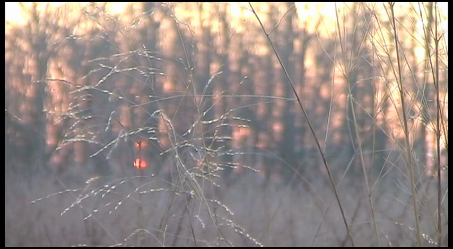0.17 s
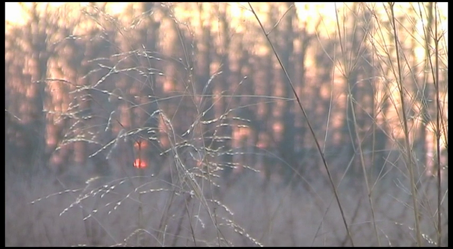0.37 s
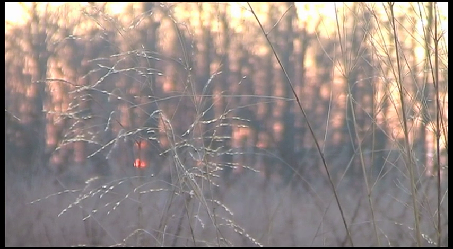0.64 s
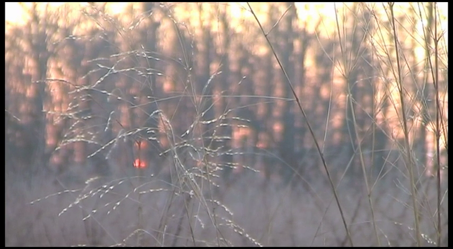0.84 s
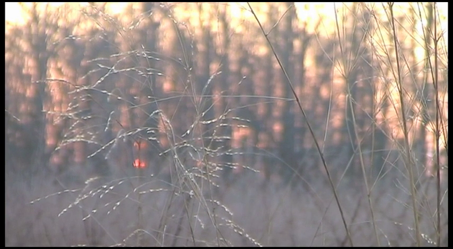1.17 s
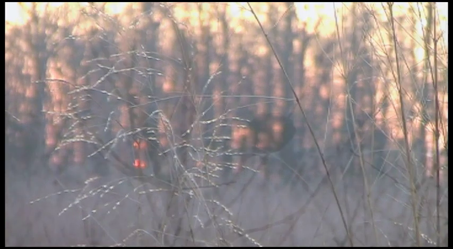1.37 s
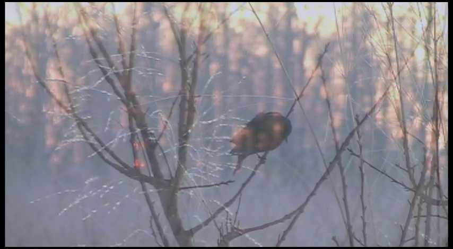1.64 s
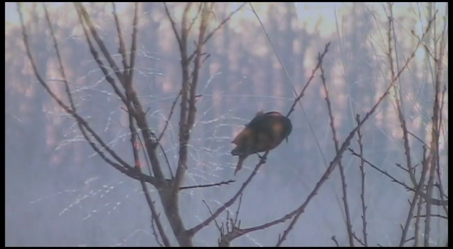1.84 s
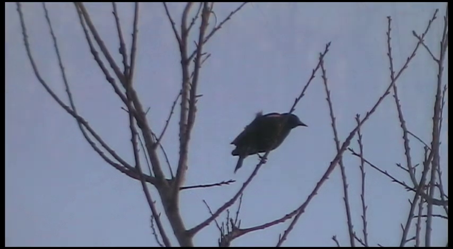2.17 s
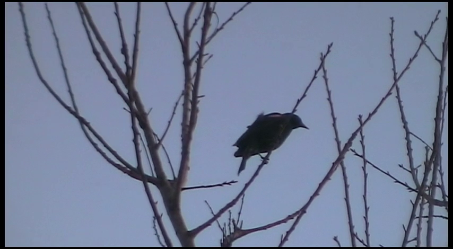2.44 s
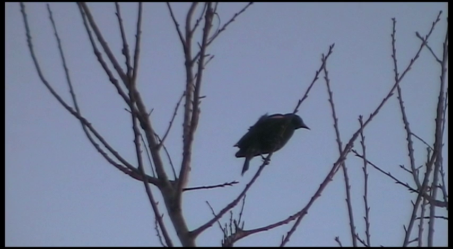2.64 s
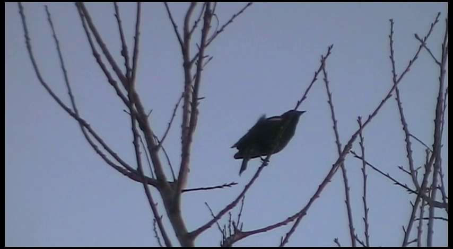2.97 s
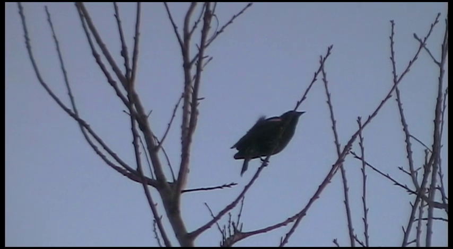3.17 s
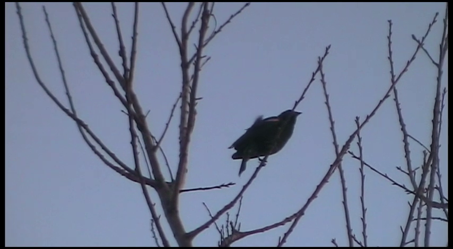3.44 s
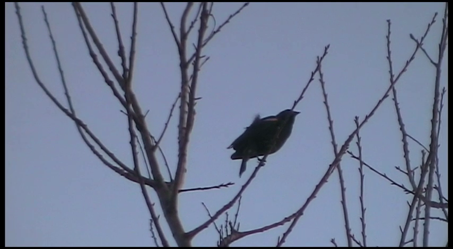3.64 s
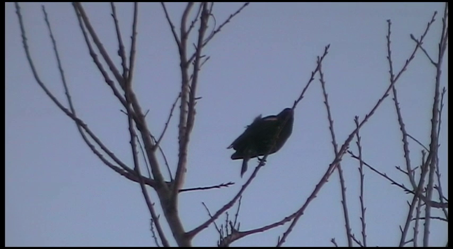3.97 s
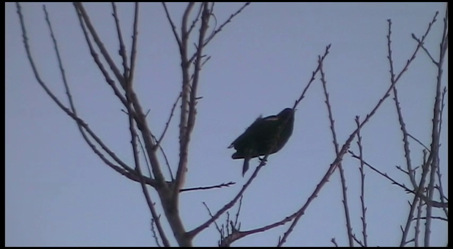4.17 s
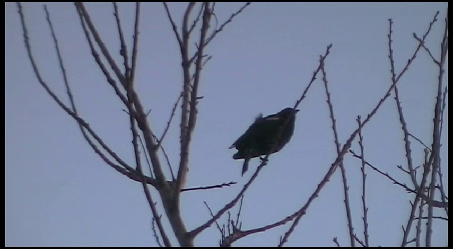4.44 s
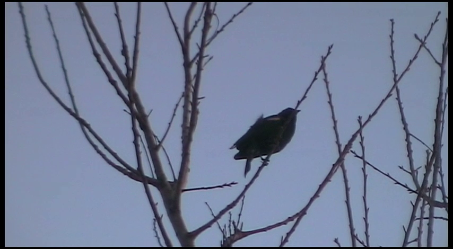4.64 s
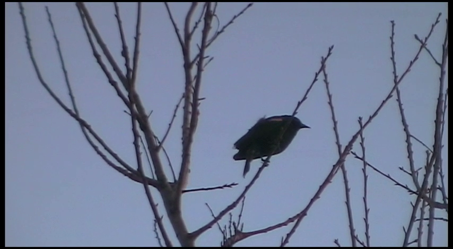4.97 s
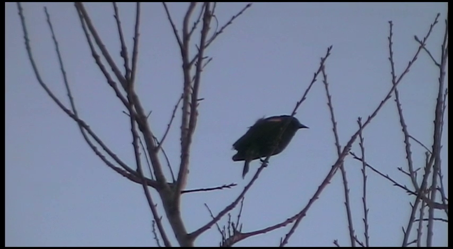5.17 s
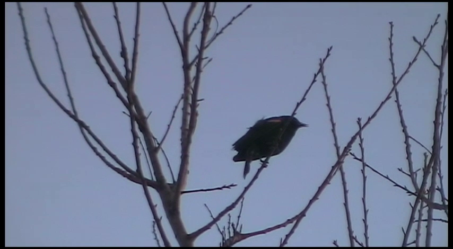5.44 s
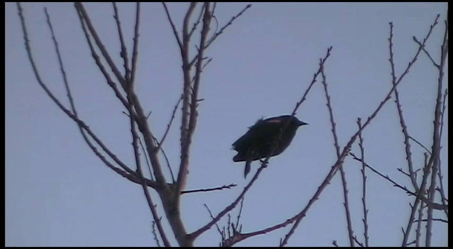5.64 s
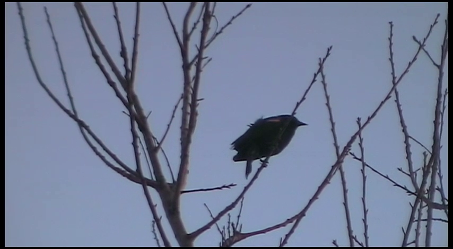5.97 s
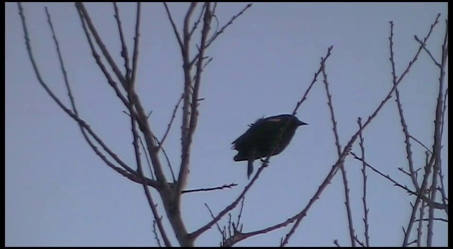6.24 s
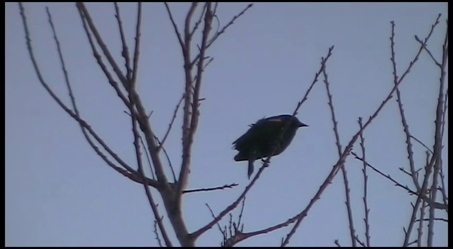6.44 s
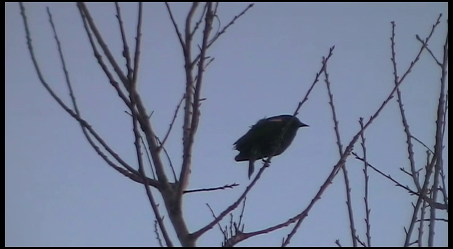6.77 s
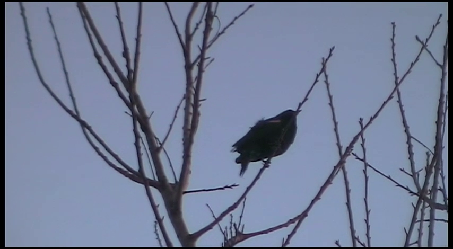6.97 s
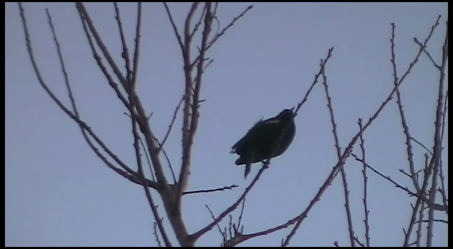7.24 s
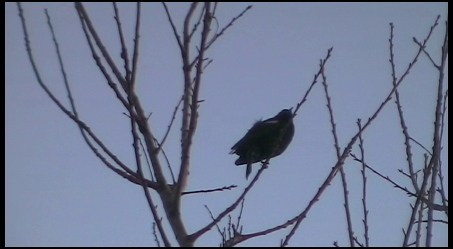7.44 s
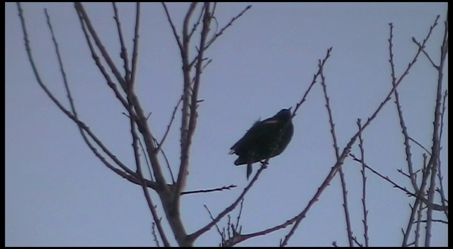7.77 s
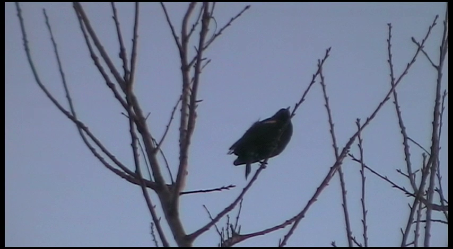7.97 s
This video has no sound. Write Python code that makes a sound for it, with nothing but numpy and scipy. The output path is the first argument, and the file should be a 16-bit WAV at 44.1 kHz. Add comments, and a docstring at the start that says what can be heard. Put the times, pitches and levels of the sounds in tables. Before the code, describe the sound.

Piercing rising and falling bird whistles ring over a distant, blurry chorus of chattering marsh birds, with low rumble, faint hum and tape hiss.

```python
"""Marsh at dawn: a near blackbird whistles long glides over a far chorus that murmurs and breaks into chatter.
Gliding sines make the whistles, chips and single notes; stacked partials make nasal calls; echoes trail them.
The chorus layers dozens of singers in three registers. A mono microphone feeds these and a low rumble
only to the left input of a tape camcorder; both inputs carry its hiss, hum and whine.
Rumble, hiss and hum step up a little after the first second."""
import sys
import numpy as np
from scipy import signal
from scipy.fft import rfft, irfft
from scipy.io import wavfile
from scipy.ndimage import uniform_filter1d

SR = 44100
rng = np.random.default_rng(int(sys.argv[2]) if len(sys.argv) > 2 else 0)


def inscribe(sig):
    """Save sig as 16-bit PCM at rate SR to the path in sys.argv[1].

    A 1-D sig is mono; a 2-D sig holds one channel per row.
    Samples are clipped to [-1, 1] before scaling.
    """
    pcm = np.round(np.clip(np.atleast_2d(sig).T, -1, 1) * 32767)
    wavfile.write(sys.argv[1], SR, pcm.astype(np.int16))


N = 358091

# how strongly the chorus sings at each pitch: [f/Hz, gain/dB]
FLOCK_RANGE = [(900, -83), (1250, -65), (1450, -68), (1900, -62), (2500, -53.5), (3400, -48), (4000, -50.5),
               (4900, -51), (5600, -56), (6300, -51), (7300, -59), (9000, -61), (10500, -71), (12000, -100)]
# borders between low, middle and high singers: [f/Hz, f/Hz]
REGISTER_BORDERS = (3630, 5360)
# bouts of chatter in the far flock: [t/s, length/s, low level/dB, middle level/dB, high level/dB]
BOUTS = [(0.0, 0.014, 12, 16.5, -7), (.05, 0.083, 2, -2, -6), (0.263, 0.13, -6, -6, -4),
         (0.604, 0.09, -6, -2, 3), (0.718, 0.14, -11, 3.5, 5.5), (0.926, .11, 2.5, 1.5, -4),
         (1.148, 0.12, -8, 5, 2), (1.299, 0.28, -0.5, 2, -4.5), (1.608, 0.13, 0.5, 3, 8.5),
         (1.786, 0.36, -2.5, -2, 0), (2.29, 0.24, 1, -14, -5), (2.677, 0.2, 4.5, 5, 2.5),
         (2.9, 0.31, 0.5, 0.5, -5), (3.306, .15, 0, 2, 7), (3.516, .2, 4.5, -6, -1),
         (3.711, 0.12, 5, 6, 6.5), (3.846, 0.3, 3.5, 4.5, 6), (4.215, 0.37, 4, 5.5, 5.5),
         (4.646, 0.2, 6, -2, -3), (4.852, 0.21, 0.5, 4, 0), (5.043, 0.18, -3.5, 0, 0.5),
         (5.24, 0.23, -1, -2, -1.5), (5.604, .12, 7, 3, 2.5), (5.798, 0.16, 5, -4, 1),
         (5.918, 0.25, 6.5, 0.5, 2), (6.096, 0.38, 4, 5, 6), (6.494, 0.25, 4, 0, 0),
         (6.719, 0.096, 3.5, 7, 8), (6.95, .07, -15, -.3, 5), (7.08, 0.15, 3.5, -3, 1),
         (7.25, 0.18, -.3, 4.5, -2), (7.5, 0.14, 1.5, -3, -6), (7.614, 0.46, 4.5, -3, 5)]
MURMUR_DB, BOUT_ATTACK_S, BOUT_RELEASE_S = -4, 0.046, 0.12
DRIFT_DB, DRIFT_PER_S = 1.5, 9  # random swelling of each register
FAR_T60_S, FAR_WET = .3, .7  # decay time and echo share of the far flock
REED_T60_S, REED_DB = .38, -10  # decay time and level of the echo behind the separate birds

# rumble of air and distance in the microphone: [f/Hz, level/dB per Hz]
RUMBLE = [(8, -80.5), (20, -77.5), (30, -83.5), (42, -80), (75, -79.5), (105, -82.5), (200, -89),
          (400, -94), (700, -98), (1000, -103), (1500, -104), (9000, -108), (12000, -118)]
# amplifier hiss: [f/Hz, level/dB per Hz]
HISS = [(8, -82.5), (20, -83), (42, -100), (75, -100.5), (200, -99), (400, -101), (1000, -102.5),
        (5000, -103), (6200, -102), (8000, -103), (16000, -103)]
# head drum hum, motor whine and line whistle: [f/Hz, left level/dB, right level/dB, waver/dB]
HUM = [(29.97, -62, -64.1, 0), (59.94, -66, -68.2, 0), (89.9, -86, -87, 0), (119.9, -76, -78.5, 0),
       (149.9, -78.5, -80.5, 0), (179.8, -85, -86, 0), (299.7, -87, -88, 0), (5185.3, -88, -88, 2.2),
       (5244.9, -92, -92, 2.2), (5994, -90, -90, 2.2), (6053.7, -87.5, -87.5, 2.2),
       (6113.8, -83.5, -83.5, 2.2), (6173.7, -75, -76, 2.2), (7102.3, -90, -90, 2.2),
       (11357, -89, -86.5, 1), (12345.5, -93, -90.5, 1), (15731.6, -88, -82.5, 0)]
# how the noise floor steps up: [t/s, rumble gain/dB, hiss gain/dB, hum gain/dB]
FLOOR_STEP = [(0, -3, -2.1, -3.6), (1.2, -3, -2.1, -3.6), (1.32, -1, -.6, -.8), (1.6, 0, 0, 0),
              (8.2, 0, 0, 0)]
TOP_HZ = 15790  # upper limit of the recorder

# single notes of other birds that stand out: [t/s, length/s, start f/Hz, end f/Hz, level/dB]
NOTES = [(0.0, .12, 2450, 2420, -53), (.005, .13, 2140, 2090, -60), (.15, .065, 4940, 4920, -60),
         (.24, .035, 4920, 4890, -57), (.726, .03, 4915, 4840, -49), (.753, .105, 1600, 1560, -69),
         (.928, .065, 3740, 3650, -57), (.958, .05, 1860, 1840, -66), (1.197, .065, 2470, 2510, -63),
         (1.202, .055, 3700, 3780, -57), (1.646, .08, 2915, 2900, -57), (1.846, .105, 2550, 2475, -61),
         (1.911, .244, 5300, 5575, -63), (2.05, .155, 2130, 2205, -62), (2.315, .125, 2735, 2910, -55),
         (2.325, .1, 3110, 3210, -54), (2.434, .1, 3055, 2830, -56), (2.544, .105, 3315, 3180, -58),
         (2.7, .045, 3710, 3705, -59), (3.0, .025, 3150, 3050, -54), (2.878, .06, 3230, 3240, -52),
         (3.392, .095, 1635, 1700, -66), (3.09, .03, 3250, 3450, -55), (3.41, .035, 4700, 4720, -55),
         (3.841, .125, 2735, 2900, -56), (3.901, .03, 3310, 3295, -49), (4.011, .03, 3200, 3200, -52),
         (4.061, .04, 3255, 3230, -50), (4.275, .125, 3355, 3465, -54), (4.42, .055, 1605, 1575, -64),
         (5.418, .06, 4630, 4630, -61), (5.637, .135, 2730, 2910, -55), (5.787, .03, 3290, 3310, -49),
         (5.792, .055, 3635, 3585, -53), (5.792, .07, 3420, 3390, -55), (5.872, .15, 2440, 2470, -59),
         (5.985, .04, 3550, 3555, -56), (5.985, .04, 3820, 3830, -55), (6.086, .125, 3295, 3170, -51),
         (6.316, .115, 1640, 1810, -64), (6.39, .03, 3420, 3480, -54), (6.72, .19, 2495, 2555, -59),
         (6.79, .085, 2810, 2800, -59), (6.795, .13, 3645, 3660, -57), (6.974, .045, 3775, 3775, -57),
         (7.129, .12, 2720, 2915, -55), (7.323, .065, 4760, 4845, -56), (7.333, .11, 2040, 2000, -64),
         (7.668, .344, 3210, 3120, -56), (7.847, .055, 2040, 2025, -59)]
# very quick flicks and chips: [t/s, length/s, start f/Hz, end f/Hz, level/dB]
FLICKS = [(.229, 0.0085, 5740, 6700, -51.5), (.434, 0.017, 4710, 6040, -48.5),
          (.462, .016, 4600, 5370, -52), (.503, .012, 4500, 4520, -58), (.517, .01, 4550, 4900, -56),
          (.535, .01, 4600, 4900, -55), (.552, .007, 4570, 4740, -58), (.568, .006, 4500, 4500, -57),
          (.58, .007, 4420, 4500, -57), (1.083, .0045, 6750, 8750, -35.5), (1.089, .0048, 8800, 4200, -49),
          (1.219, 0.0075, 5400, 6260, -50), (1.309, 0.0078, 5130, 6070, -48),
          (1.391, .007, 5200, 6100, -50), (1.614, .0073, 7900, 9500, -42.5),
          (2.782, 0.013, 6250, 6080, -44), (2.8, 0.018, 6090, 6370, -46), (2.806, 0.019, 6000, 5300, -52),
          (3.308, 0.0076, 6100, 9100, -51), (3.315, .0063, 9100, 6000, -55),
          (5.788, 0.018, 3230, 3560, -45), (5.805, 0.0043, 3300, 3870, -42),
          (5.822, .0053, 3450, 4020, -44), (6.006, .0071, 7660, 9760, -43.5),
          (8.075, 0.031, 4970, 4700, -53.5)]
# nasal calls, level before nose: [t/s, length/s, start f/Hz, end f/Hz, level/dB, lean/dB per kHz]
NASAL = [(0.335, 0.061, 782, 800, -60, 0.5), (2.7, .065, 800, 813, -61, 1.8),
         (3.759, 0.064, 785, 825, -53.5, 3), (5.602, 0.099, 780, 807, -56, -3),
         (5.955, 0.088, 811, 833, -50, -1), (6.634, 0.045, 645, 638, -55.5, 0.3),
         (6.745, 0.048, 775, 790, -53, 1.5)]
# nose and throat resonances: [f/Hz, gain/dB]
NOSE = [(2400, -16), (3250, -1.5), (4000, -1), (4800, -15.5), (5600, -10), (6450, 0.5), (7300, -17)]

# near bird's pitch shapes, before the pitch factor:
# an opening [t after start/s, f/Hz] and a closing [t before end/s, f/Hz]
ARCH = ([(0, 6000), (.018, 6212), (.034, 6632), (.05, 8074), (.06, 9786), (.072, 10152), (.15, 10217)],
        [(.11, 9948), (.06, 8688), (.02, 7041), (.01, 6804), (0, 6782)])
SLUR = [(0, 3779), (.023, 4026), (.042, 4400), (.075, 4489)], [(.1, 4410), (0, 4440)]
SCOOP = ([(0, 7800), (.06, 5770), (.108, 5020), (.152, 4246), (.226, 3550), (.28, 3325), (.35, 3200)],
         [(.176, 3210), (.156, 3500), (.136, 4560), (.118, 4950), (.085, 5210), (.06, 5250), (.02, 5130),
         (0, 5135)])
HELD = [(0, 6000), (.034, 5195), (.077, 5025), (.12, 4941), (.19, 5017)], [(.15, 4865), (.08, 4925),
        (0, 4900)]
PIP = [(0, 5900), (.003, 6190)], [(.034, 6319), (0, 6212)]
# near bird's whistles, level before beak:
# [shape, start t/s, end t/s, pitch factor, level/dB, attack/s, release/s, second partial level/dB]
SONG = [(ARCH, .766, 1.084, 1, -35.5, .018, .008, -36), (SLUR, 1.1, 1.28, 1, -38, .02, .07, -30),
        (SCOOP, 1.622, 2.259, .993, -35.3, .004, .04, -31), (HELD, 2.8, 3.312, 1, -40.5, .085, .025, -26),
        (PIP, 3.323, 3.37, 1, -35, .003, .04, -30), (SCOOP, 6.014, 6.629, 1.008, -35, .004, .03, -31)]
# throat and beak carry some pitches better: [f/Hz, gain/dB]
BEAK = [(3190, -18.5), (3310, -11), (3600, -6.5), (4300, -5), (5100, 0.5), (5900, -11), (6600, -4),
        (8100, -9.5), (9800, -14), (10200, -20)]
FADE_DB, THIRD_DB = -19, -40  # gain at the tips of attack and release; third partial


def undb(db):
    """Turns decibels into an amplitude factor."""
    return 10 ** (np.asarray(db) / 20)


def unit(x):
    """Scales a sound to an rms of 1."""
    return x / np.sqrt(np.mean(x ** 2))


def columns(table):
    """Each column of a curve table, sample by sample."""
    s, *rest = np.transpose(table)
    return [np.interp(np.arange(N) / SR, s, c) for c in rest]


def walk(rate):
    """Random levels held 1 / rate s and slewed twice; spread 1."""
    hold = int(SR / rate)
    steps = np.repeat(rng.standard_normal(N // hold + 1), hold)
    slewed = uniform_filter1d(uniform_filter1d(steps, hold), hold)
    return unit(slewed[:N])


def bin_hz():
    """Frequency of each spectrum bin, lifted 1 Hz to keep its logarithm finite."""
    return np.arange(N // 2 + 1) * SR / N + 1


def tone_curve(points):
    """Gain of each spectrum bin, drawn through the points on a log pitch scale."""
    hz, db = np.transpose(points)
    return undb(np.interp(np.log(bin_hz()), np.log(hz), db))


def coloured(points):
    """Noise with a spectrum of (Hz, dB per Hz) points."""
    spectrum = rfft(rng.standard_normal(N)) * tone_curve(points)
    return irfft(spectrum, N) * np.sqrt(SR / 2)


def echoes(x, t60, lumps_db=3):
    """Scatter from stems and trunks: a decaying noise tail of unit energy with random lumps in level."""
    t = np.arange(SR) / SR
    decay = np.exp(-np.log(1000) * t / t60)
    onset = np.minimum(t / 0.017, 1)
    tail = rng.standard_normal(SR) * decay * onset * undb(lumps_db * walk(148)[:SR])
    return signal.fftconvolve(x, tail / np.sqrt(np.sum(tail ** 2)))[:N]


def add(out, start, hz, gain, edge_s):
    """Adds a sine that follows hz, with rounded ends; gain is rms."""
    i = int(start * SR)
    n = min(len(hz), N - i)
    t = np.arange(n) / SR
    edge = np.sin(np.pi / 2 * np.clip(np.minimum(t, t[-1] - t) / edge_s, 0, 1)) ** 2
    tone = gain * np.sin(2 * np.pi * np.cumsum(hz) / SR)
    out[i:i + n] += np.sqrt(2) * tone[:n] * edge


def flock(lo_hz=1100, hi_hz=10500, count=44):
    """Dozens of far singers chatter in short sweeps, held notes and fast trills; the marsh blurs them."""
    out, t = 0, np.arange(N) / SR
    for trill_hz in np.linspace(45, 220, num=count):
        draw = rng.random((1200, 5))
        lengths = .01 + .05 * draw[:, 0] ** 2
        ends = np.cumsum(lengths)
        note = np.minimum(np.searchsorted(ends, t), len(ends) - 1)
        remaining = (ends[note] - t) / lengths[note]  # 1 at the note's start, 0 at its end
        pitch = lo_hz * (hi_hz / lo_hz) ** draw[:, 2]
        # short notes sweep most; most notes are trilled
        sweep = .004 / lengths * (draw[:, 3] - .5)
        trill = (draw[:, 1] < .7) * 0.05003
        wobble = trill[note] * np.sin(2 * np.pi * trill_hz * t)
        hz = pitch[note] * (1 + sweep[note] * remaining + wobble)
        # a few notes stand well above the rest
        loudness = undb(5 * draw[:, 4] + 9 * draw[:, 4] ** 6)
        swell = loudness[note] * np.sin(np.pi * remaining)
        out = out + swell * np.sin(2 * np.pi * np.cumsum(hz) / SR)
    blurred = unit(echoes(out, FAR_T60_S))
    return FAR_WET * blurred + np.sqrt(1 - FAR_WET ** 2) * unit(out)


def swells():
    """Gains of the low, middle and high singers: a murmur, the bouts on top, a random drift."""
    t = np.arange(N) / SR
    power = np.full((3, N), undb(MURMUR_DB) ** 2)
    for s, length, *db in BOUTS:
        rise = (t - s) / BOUT_ATTACK_S + .5
        fall = (s + length - t) / BOUT_RELEASE_S + .5
        shape = np.clip(np.minimum(rise, fall), 0, 1)
        power += np.outer(undb(db) ** 2, shape ** 2)
    return [np.sqrt(p) * undb(DRIFT_DB * walk(DRIFT_PER_S)) for p in power]


def chorus():
    """The flock weighted across its pitch range, split into low, middle and high singers that swell apart."""
    spectrum = rfft(flock()) * tone_curve(FLOCK_RANGE)
    # neighbouring registers cross over within half an octave
    middle, high = (np.clip(.5 + np.log2(bin_hz() / border) / 0.5, 0, 1) for border in REGISTER_BORDERS)
    shares = (1 - middle, middle - high, high)
    return sum(gain * irfft(spectrum * share, N) for gain, share in zip(swells(), shares))


def rumble():
    """Air and distance in the microphone: mostly low noise whose level wanders slowly."""
    return undb(1.1 * walk(1.37)) * coloured(RUMBLE)


def hiss():
    """Amplifier hiss: independent coloured noise in each input."""
    return np.array([coloured(HISS), coloured(HISS)])


def hum():
    """Electrical tones, the same pitches in both inputs at similar levels; the whine wavers in level."""
    out, t, waver = 0, np.arange(N) / SR, walk(2.4)
    for hz, left_db, right_db, waver_db in HUM:
        tone = np.sqrt(2) * np.sin(2 * np.pi * (hz * t + rng.random())) * undb(waver_db * waver)
        out = out + tone * undb([[left_db], [right_db]])
    return out


def notes(table, edge_share, flutter_db, waver=0.0055, bend=1):
    """Glides from start to end pitch (late if bent) that waver and flutter, each in its own way."""
    out, pitch_walk, level_walk = np.zeros(N), walk(120), walk(70)
    for k, (s, length, hz0, hz1, db) in enumerate(table):
        n = int(length * SR)
        first = k * (N - n) // len(table)
        own = slice(first, first + n)  # this note's piece of the random walks
        glide = hz0 + (hz1 - hz0) * np.linspace(0, 1, n) ** bend
        hz = glide * (1 + waver * pitch_walk[own])
        add(out, s, hz, undb(db + flutter_db * level_walk[own]), edge_share * length)
    return out


def single_notes():
    """Other birds' notes: straight glides of a sine with softly rounded ends."""
    return notes(NOTES, .2, 2.6)


def flicks():
    """Quick flicks and chips: very short sines whose pitch moves most toward the end."""
    return notes(FLICKS, 0.07, 1.9, bend=1.58)


def nasal():
    """Each call stacks partials, third to tenth at most, of a low pitch, shaped by the nose resonances."""
    nose_hz, nose_db = np.transpose(NOSE)
    partials = []
    for s, length, hz0, hz1, db, lean_db in NASAL:
        for k in range(3, 11):
            if k * hz1 < nose_hz[-1]:
                lean = lean_db * (k * hz1 / 1000 - 4)  # tilts about 4 kHz
                level_db = db + np.interp(k * hz1, nose_hz, nose_db) + lean
                partials.append((s, length, k * hz0, k * hz1, level_db))
    return notes(partials, 0.32, 3.9, waver=0.0019)


def near_bird():
    """Almost pure glides, loudest where the beak resonates, with faint overtones, tremor and flutter."""
    out = np.zeros(N)
    tremor = 1 + .0025 * walk(150)  # in pitch
    flutter = undb(2.1 * walk(190))  # in level
    beak_hz, beak_db = np.transpose(BEAK)
    for (opening, closing), start, end, factor, db, attack, release, second_db in SONG:
        t = np.arange(0, end - start, 1 / SR)
        # the pitch glides from the opening to the closing, corners smoothed
        s, hz = np.transpose(opening + [(end - start - before, f) for before, f in closing])
        log_hz = np.interp(t, s, np.log(hz))
        pitch = factor * np.exp(uniform_filter1d(log_hz, size=200, mode="nearest"))
        fade = np.clip(1 - t / attack, 0, 1) + np.clip(1 - (t[-1] - t) / release, 0, 1)
        level_db = db + np.interp(pitch, beak_hz, beak_db) + FADE_DB * fade
        for multiple, under_db in enumerate((0, second_db, THIRD_DB), start=1):
            f = multiple * pitch * tremor[int(start * SR):][:len(t)]
            in_band = f < .45 * SR  # mutes partials too high for the sample rate
            add(out, start, f, undb(level_db + under_db) * in_band, .004)
    return out * flutter


def scene():
    """Birds, their echoes, chorus and rumble on the left; stepped hiss and hum on both inputs."""
    rumble_db, hiss_db, hum_db = columns(FLOOR_STEP)
    birds = single_notes() + flicks() + nasal() + near_bird()
    mic = birds + undb(REED_DB) * echoes(birds, REED_T60_S) + chorus()
    mic = mic + undb(rumble_db) * rumble()
    return np.array([mic, 0 * mic]) + undb(hiss_db) * hiss() + undb(hum_db) * hum()


def record(dry):
    """The recorder cuts the top steeply."""
    return signal.sosfilt(signal.ellip(12, .1, 80, TOP_HZ, fs=SR, output="sos"), dry)


dry = scene()
out = record(dry)
inscribe(out)
```